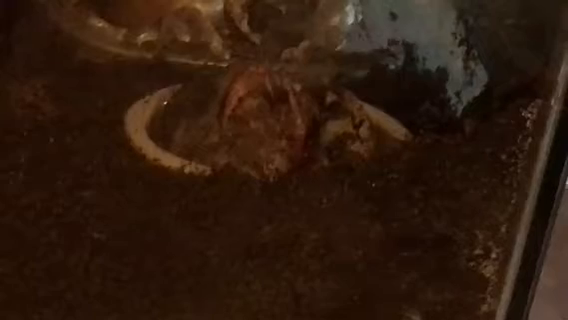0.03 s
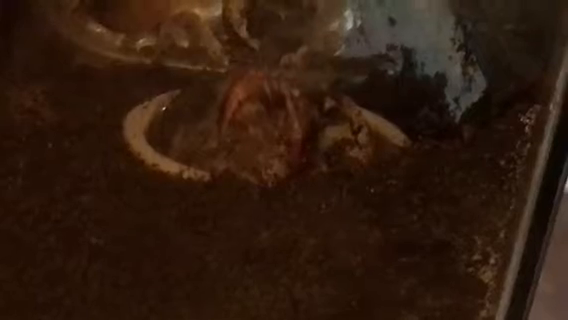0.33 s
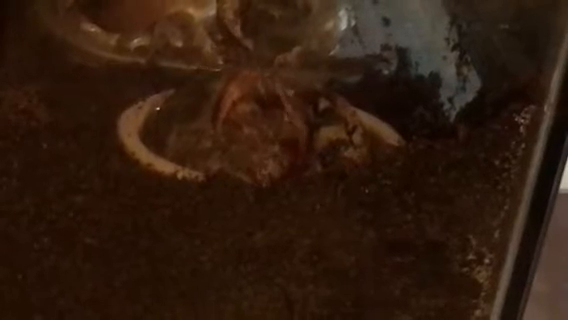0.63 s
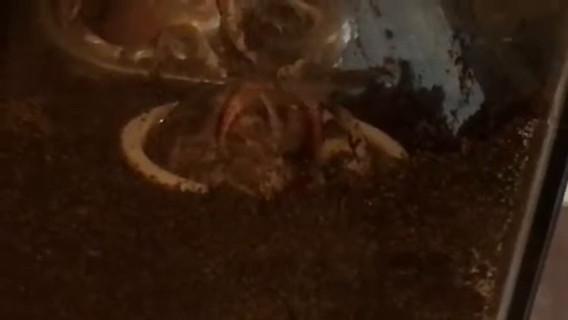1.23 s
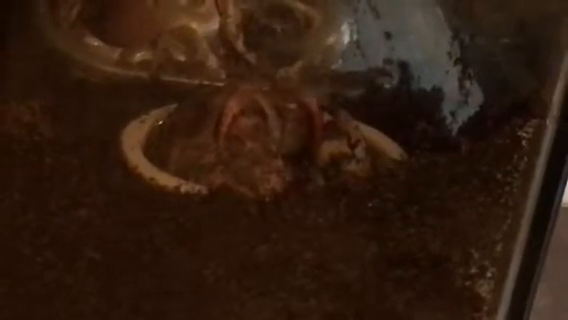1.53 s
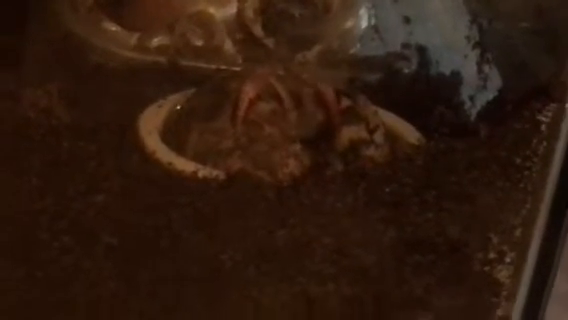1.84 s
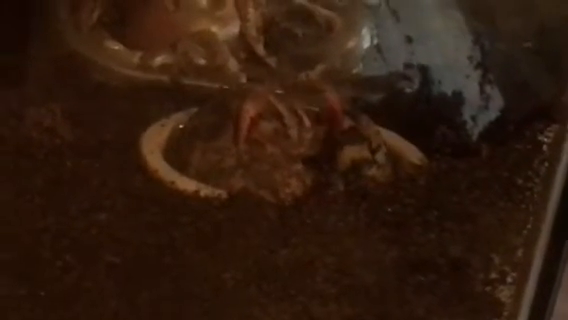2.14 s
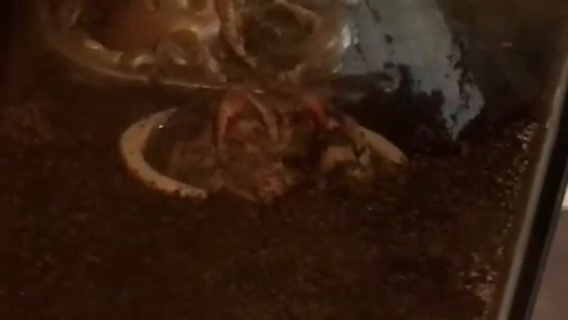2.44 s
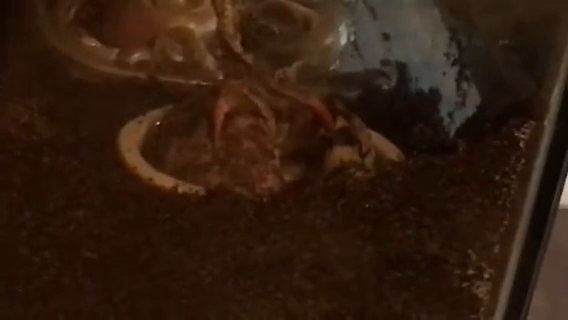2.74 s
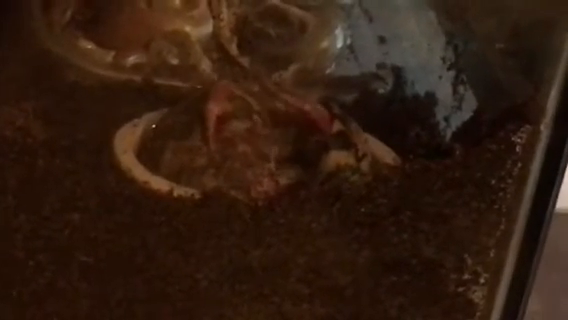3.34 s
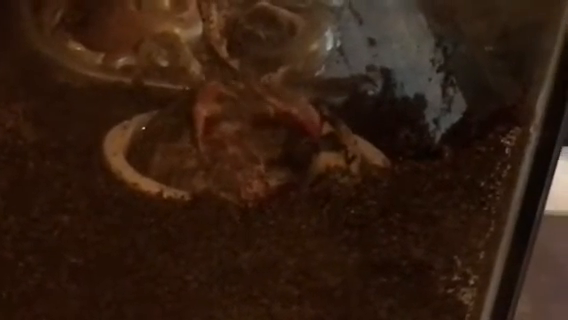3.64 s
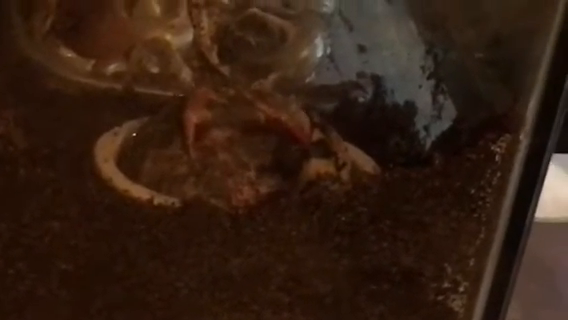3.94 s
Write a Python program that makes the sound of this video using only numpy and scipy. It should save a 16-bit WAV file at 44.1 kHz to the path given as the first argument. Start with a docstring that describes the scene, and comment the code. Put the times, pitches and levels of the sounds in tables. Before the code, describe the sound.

Water trickles quietly in a small glass tank from about 0.1 seconds, with tiny splashes, ringing bubbles and little ticks over a steady low pump hum and faint hiss. Between 2 and 2.4 seconds a few soft low bumps pass and the hum dips briefly. The tank booms faintly a few times until about 3.5 seconds, and the water and hum continue to the end at 4 seconds.

```python
"""After a moment of silence, a pump hums at mains pitch beside a small glass tank with a crab in it.
From the start, water trickles in with small splashes, over dull pump noise and faint hiss.
Bubbles ring and burst with little ticks, and the glass walls smear them with echoes.
Halfway through, a few soft low bumps pass and the hum dips briefly.
The tank booms softly now and then, mostly in the second half, and the water runs on to the end."""
import sys
import numpy as np
from scipy import signal
from scipy.fft import rfft, irfft
from scipy.io import wavfile
from scipy.ndimage import uniform_filter1d

SR = 44100
rng = np.random.default_rng(int(sys.argv[2]) if len(sys.argv) > 2 else 0)


def generate_wav(sig):
    """Save sig (samples, or channels by samples) to the path in sys.argv[1] as 16-bit PCM at SR."""
    pcm = np.round(np.clip(np.atleast_2d(sig).T, -1, 1) * 32767).astype(np.int16)
    wavfile.write(sys.argv[1], SR, pcm)


N = 176400
T = np.arange(N) / SR
AGE = np.arange(SR // 4) / SR  # seconds since a short sound began

# The tones of the pump's hum: multiple of the mains pitch, level/dB
HUM_TONES = [(1, -44.5), (2, -65), (4, -75.5), (5, -69), (6, -70), (7, -74), (10, -76.5), (18, -79.5),
             (19, -88.5)]
# Brief dips in the hum: t/s, share of the hum lost
HUM_DIPS = [(2.03, 0.38), (2.085, 0.59), (2.24, 0.2), (2.285, 0.31), (2.40, .25)]
# The four water tables give levels before the tank colours the sound.
# Bubbles that ring clearly: t/s, f/Hz, level/dB
BUBBLES = [(.148, 1950, -65.5), (.205, 567, -64), (.256, 3440, -69), (.383, 3500, -74), (.470, 1044, -61),
           (.486, 1660, -69.5), (.538, 2060, -64), (.560, 820, -65), (.636, 560, -62.5),
           (.670, 1016, -64.5), (.735, 1070, -67.5), (.888, 1030, -72), (1.090, 3620, -66),
           (1.173, 567, -69), (1.232, 2560, -62), (1.259, 2550, -63), (1.313, 1990, -66.5),
           (1.331, 337, -60), (1.343, 3800, -65), (1.511, 2180, -66.5), (1.553, 2820, -66.5),
           (1.603, 590, -76), (1.622, 1045, -61), (1.647, 3580, -65), (1.665, 8000, -74),
           (1.672, 1120, -80), (1.769, 724, -67), (1.838, 1065, -66.5), (1.849, 2300, -66.5),
           (1.899, 4440, -67.5), (1.964, 8340, -69), (2.137, 554, -60), (2.152, 627, -60),
           (2.217, 1970, -63.5), (2.254, 557, -59.5), (2.302, 2110, -61.5), (2.375, 1930, -65),
           (2.393, 1860, -61), (2.411, 2210, -61), (2.426, 1060, -69), (2.463, 1037, -63),
           (2.551, 6450, -69.5), (2.567, 1780, -55.5), (2.582, 2130, -59), (2.670, 3840, -69),
           (2.940, 2300, -68.5), (3.002, 530, -59.5), (3.180, 1840, -67.5), (3.254, 2130, -65),
           (3.352, 530, -63), (3.381, 1870, -65.5), (3.413, 4750, -70), (3.428, 4900, -69),
           (3.692, 2206, -57), (3.756, 3730, -64), (3.822, 1295, -60), (3.853, 1280, -67),
           (3.983, 3000, -64.5)]
# Surfacing bubbles that slide up in pitch: t/s, middle f/Hz, level/dB
BLOOPS = [(.177, 4040, -69.5), (.855, 633, -76), (.980, 585, -62.5), (1.019, 2210, -68), (1.062, 1060, -64),
          (1.075, 3080, -69), (1.146, 1365, -74), (2.628, 1650, -62.5)]
# Ticks of bursting bubbles and droplets: t/s, middle f/Hz, level/dB, width/octaves
TICKS = [(0.146, 8000, -72.5, 0.15), (.313, 9500, -73, .35), (0.719, 3770, -65.5, 0.47),
         (0.725, 6200, -63.5, 0.57), (0.93, 6600, -68, 0.74), (.995, 3480, -65, .7),
         (1.234, 2740, -66, 0.19), (1.301, 5900, -69, 1), (1.557, 7100, -71, 0.33),
         (1.652, 10900, -71, .25), (1.829, 6200, -74, .3), (1.999, 5500, -74, 0.66),
         (2.066, 4500, -71, 0.41), (2.086, 7040, -72.5, 0.34), (2.416, 5000, -68, 0.96),
         (2.5, 7700, -60, 0.19), (2.501, 2930, -61.5, 0.26), (2.567, 2320, -66, 0.76),
         (2.580, 12000, -77, .25), (2.836, 4470, -69.5, 0.56), (2.938, 8160, -71.5, 0.7),
         (3.253, 5900, -66, .8), (3.412, 4300, -60.5, 0.25), (3.481, 12000, -81, 0.5),
         (3.62, 3320, -61, 0.65), (3.772, 1280, -60.5, 0.44), (3.98, 3700, -69, .4)]
# Small splashes: t/s, length/s, level of each low bubble/dB, level of each droplet/dB
SPLASHES = [(.352, 0.054, -70.5, -70), (.495, 0.086, -71, -75), (0.906, 0.048, -79, -70),
            (1.505, 0.037, -70, -79.5), (1.736, 0.049, -73, -78), (1.895, 0.05, -69, -73),
            (2.148, .035, -71, -74.5), (2.39, 0.039, -67, -72.5), (2.571, .035, -72, -73),
            (2.900, 0.067, -66.5, -76), (3.274, .06, -66.5, -76), (3.435, .04, -66, -76.5),
            (3.640, .04, -68.5, -80), (3.722, 0.026, -83, -73.5), (3.777, 0.048, -65.5, -86)]
# Pitches the tank boosts (+) or cancels (-): f/Hz, width/Hz, gain/dB
TANK_BANDS = [(814, 16, 6), (882, 35, -12.5), (1106, 112, 7), (1194, 190, -4.5), (1365, 6.3, 10.5),
              (2806, 72, -12), (2890, 33, 10), (3005, 51, -12.5), (3080, 20, 10.5), (3594, 64, 7.5),
              (4990, 610, -5.5), (5380, 410, 4), (7640, 420, -4), (13550, 630, 7), (14100, 430, -1)]
# Soft low thuds: t/s, f/Hz, level/dB
BUMPS = [(2.04, 75, -60), (2.06, 46, -58), (2.23, 42, -58), (2.26, 82, -59)]
# Swells of the tank's low note: t/s, length/s, level/dB
BOOMS = [(0.294, 0.24, -71), (2.302, 0.36, -63), (2.804, 0.29, -63), (3.28, 0.26, -66)]
# The steady noise of pump and room, from low to high: f/Hz, relative level/dB
NOISE_SHAPE = [(20, -40), (36, 1.5), (85, 3.5), (145, -4.5), (190, 0), (250, -7), (330, -4), (450, -10.5),
               (550, -0.5), (720, -19.5), (1030, -12.5), (1400, -24), (2000, -17.5), (2700, -27),
               (5000, -26), (9300, -29.5), (10500, -33.5), (12000, -28.5), (15500, -33)]


def pump(mains_hz=60.01, hum_waver_db=.2, buzz_waver_db=1.6, dip_s=.015):
    """The pump hums a firm mains tone that dips a few times, with weak, wavering overtones."""
    out = np.zeros(N)
    dips = 1 - sum(depth * np.exp(-((T - s) / dip_s) ** 2) for s, depth in HUM_DIPS)
    for multiple, db in HUM_TONES:
        if multiple == 1:
            gain = dips * undb(hum_waver_db * drift(4.4))
        else:
            gain = undb(buzz_waver_db * drift(4.455))
        tone = np.sqrt(2) * np.sin(2 * np.pi * (multiple * mains_hz * T + rng.random()))
        out += undb(db) * gain * tone
    return out


def water():
    """The water sounds that stand out: clear bubbles, rising bloops and ticks."""
    out = np.zeros(N)
    for s, hz, db in BUBBLES:
        add(out, s, bubble(hz), db)
    for s, hz, db in BLOOPS:
        add(out, s, bloop(hz), db)
    for s, hz, db, octaves in TICKS:
        add(out, s, wall_echoes(snap(hz, octaves)), db)
    return out


def bubble(hz, cycles=5.85, rise=.045, snap_db=-9.5, full_echo_hz=1300):
    """A snap, then a fading ring whose pitch rises as the bubble nears the surface."""
    life = AGE * hz / cycles  # at 1, the ring has faded to about a third
    pitch = hz * (1 + rise * np.minimum(life, 2 * np.pi))
    ring = np.sin(2 * np.pi * np.cumsum(pitch) / SR) * np.exp(-life)
    pop = undb(snap_db) * snap(hz, octaves=.7)
    return wall_echoes(set_level(ring, 0) + pop, amount=min(1, hz / full_echo_hz))  # low ones echo less


def bloop(hz, length_s=.026, rise_octaves=.9):
    """A surfacing bubble swells and fades while its pitch slides up."""
    life = np.minimum(AGE / length_s, 1)
    pitch = hz * 2 ** (rise_octaves * (life - .5))
    swell = np.sin(np.pi * life) ** 2
    return wall_echoes(np.sin(2 * np.pi * np.cumsum(pitch) / SR) * swell)


def snap(hz, octaves=.27, fade_s=.0018, dull_above_hz=10500):
    """A bubble's thin skin bursts with a very short puff of noise around one pitch."""
    def band(f):
        hump = np.exp(-.5 * (np.log2(f / hz) / octaves) ** 2)
        return hump / np.sqrt(1 + (f / max(hz, dull_above_hz)) ** 12)
    return set_level(noise(band, len(AGE)) * np.exp(-AGE / fade_s), 0)


def splashes(count=6, gurgle_hz=767, gurgle_octaves=.7, spray_hz=1770):
    """Each splash lets go a run of low bubbles and a spray of droplets."""
    out = np.zeros(N)
    for s, length, gurgle_db, spray_db in SPLASHES:
        for k, (when, height, lands, drop_height) in enumerate(rng.random((count, 4))):
            hz = gurgle_hz * 2 ** (gurgle_octaves * (2 * height - 1))
            gurgle = bubble(hz, cycles=2.8)  # crowded bubbles die sooner
            add(out, s + length * (k + when) / count, gurgle, gurgle_db)
            droplet = snap(spray_hz * 2 ** (drop_height - .5), octaves=.7)
            add(out, s + length * (k + lands) / count, wall_echoes(droplet), spray_db)
    return out


def trickle(per_s=140, low_hz=522.6, high_hz=7000, db_per_octave=-1, spread_db=2.2):
    """Trickling water makes many faint bubbles; the small, high ones are weaker."""
    out = np.zeros(N)
    for when, height, strength in rng.random((int(per_s * N / SR), 3)):
        hz = low_hz * (high_hz / low_hz) ** height
        usual_db = -77 + db_per_octave * np.log2(hz / 3000)
        db = usual_db + spread_db * np.sqrt(12) * (strength - .5)
        add(out, when * N / SR, bubble(hz), db)
    return out


def fizz(per_s=75, low_hz=1190, high_hz=13900, spread_db=4):
    """Tiny bubbles burst all over the surface with faint snaps."""
    out = np.zeros(N)
    for when, height, strength in rng.random((int(per_s * N / SR), 3)):
        hz = low_hz * (high_hz / low_hz) ** height
        add(out, when * N / SR, snap(hz), db=-86.5 + spread_db * (2 * strength - 1))
    return out


def wall_echoes(x, amount=1, short_s=.08, long_s=.15, delay_s=.003, density=.03):
    """Sound bounces between the glass walls, differently for each spot on the water."""
    echoes = 0
    for fade_s, db in ((short_s, -1), (long_s, -2)):
        arrives = (rng.random(len(AGE)) < density) & (AGE > delay_s)
        fade = np.exp(-np.log(1000) * AGE / fade_s)  # 60 dB down after fade_s
        tail = arrives * rng.standard_normal(len(AGE)) * fade
        echoes = echoes + undb(db) * tail / np.linalg.norm(tail)
    return x + amount * signal.fftconvolve(x, echoes)[:len(x)]


def tank_colour(x):
    """The tank rings at some pitches after every drop and swallows others."""
    for hz, width, db in TANK_BANDS:
        half_gain = undb(db / 2)
        span = np.pi * width / SR
        tuning = -2 * np.cos(2 * np.pi * hz / SR)
        boost, cut = span * half_gain, span / half_gain
        x = signal.lfilter([1 + boost, tuning, 1 - boost], [1 + cut, tuning, 1 - cut], x)
    return x


def bumps(rise_s=.015):
    """Soft low thuds swell and die within a few cycles."""
    out = np.zeros(N)
    for s, hz, db in BUMPS:
        tone = np.sin(2 * np.pi * (hz * AGE + rng.random()))
        add(out, s, tone * AGE * np.exp(-AGE / rise_s), db)
    return out


def booms(hz=186, width_hz=28):
    """One low note of the tank swells and fades now and then."""
    ring = set_level(noise(lambda f: 1 / (1 + ((f - hz) / width_hz) ** 2)), 0)
    swells = sum(undb(db) * np.sin(np.pi * np.clip((T - s) / length, 0, 1)) for s, length, db in BOOMS)
    return ring * swells


def background():
    """The pump and the room give a steady dull noise and a faint hiss."""
    hz, db = np.array(NOISE_SHAPE).T
    return set_level(noise(lambda f: undb(np.interp(np.log(f), np.log(hz), db))), -62.5)


def undb(db):
    """Turn decibels into a number to multiply by."""
    return 10 ** (np.asarray(db) / 20)


def set_level(x, db):
    """Scale a sound to an average (rms) level."""
    return x * undb(db) / np.std(x)


def drift(per_s):
    """A slow random wander of about 1 either way: random steps, smoothed twice."""
    hold = int(SR / per_s)
    steps = np.repeat(rng.standard_normal(N // hold + 1), hold)
    return 1.3 * uniform_filter1d(uniform_filter1d(steps, hold), hold)[:N]


def noise(gain, size=N):
    """Noise whose strength at each frequency f is shaped by gain(f)."""
    f = np.fft.rfftfreq(size, 1 / SR) + 1
    return irfft(rfft(rng.standard_normal(size)) * gain(f), size)


def add(out, s, x, db, window_s=.02):
    """Mix in a short sound at time s, with as much energy as level db held for window_s."""
    start = int(np.clip(s * SR, 0, N - 1))
    scaled = x * undb(db) * np.sqrt(window_s * SR / np.sum(x ** 2))
    out[start:start + len(x)] += scaled[:N - start]


def scene():
    """The hum, bumps and booms, plus the water and noise heard through the tank."""
    inside = background() + water() + splashes() + trickle() + fizz()
    return (pump() + bumps() + booms() + tank_colour(inside))[None]


def record(dry):
    """The sound starts after a moment of silence, and the highest treble is cut."""
    start_s, top_hz = .12, 15750
    opened = dry * np.clip((T - start_s) / .001, 0, 1)
    return signal.sosfilt(signal.ellip(10, .1, 70, top_hz, fs=SR, output="sos"), opened)


dry = scene()
out = record(dry)
generate_wav(out)
```